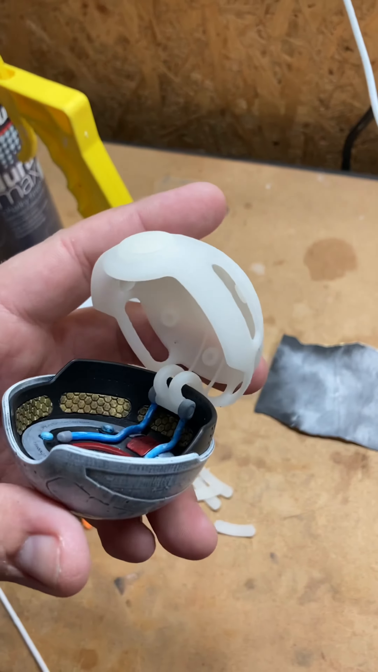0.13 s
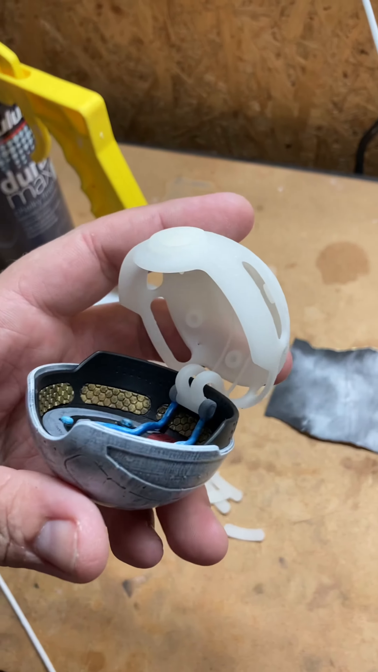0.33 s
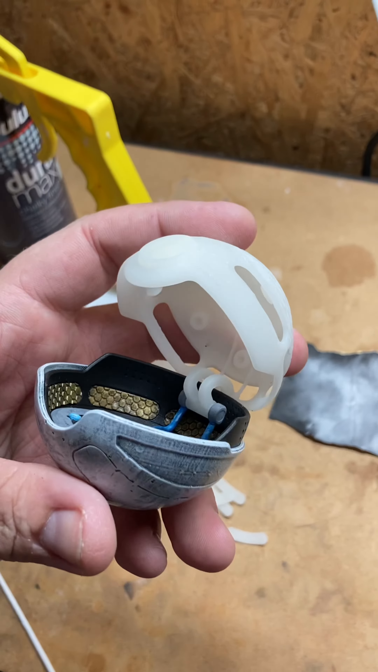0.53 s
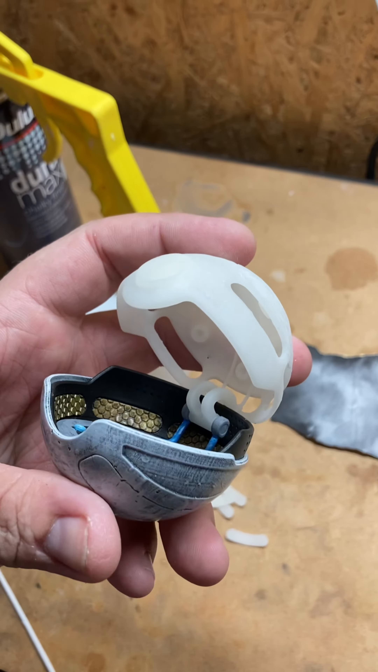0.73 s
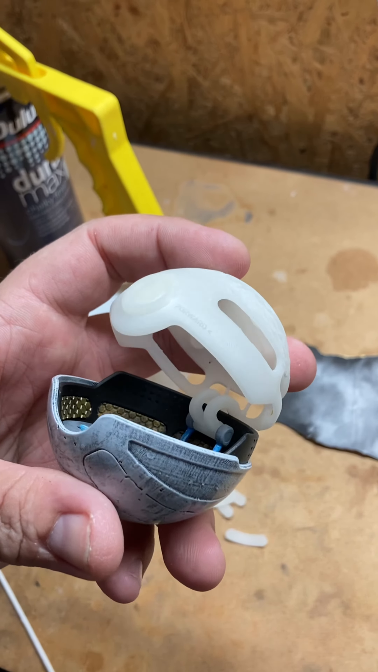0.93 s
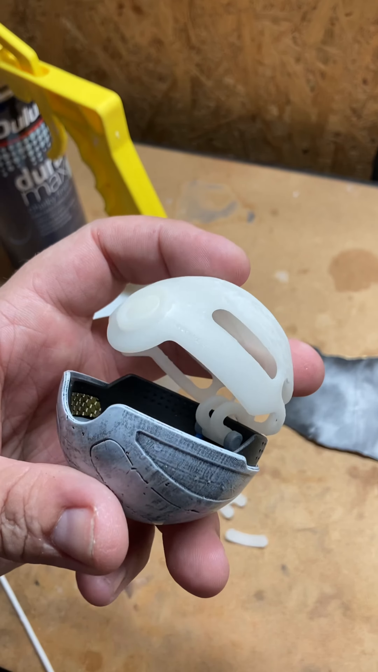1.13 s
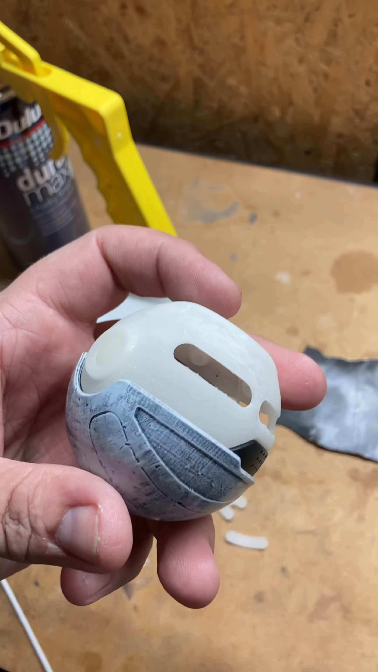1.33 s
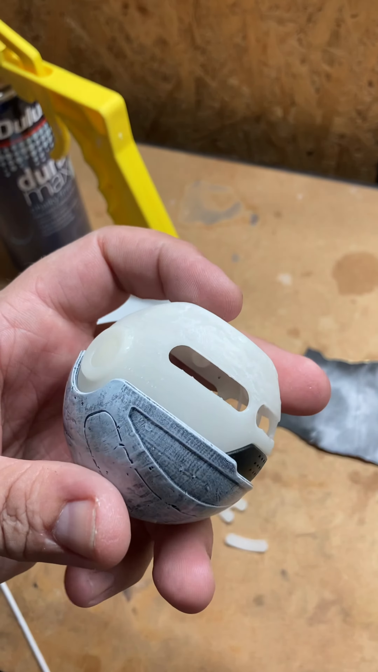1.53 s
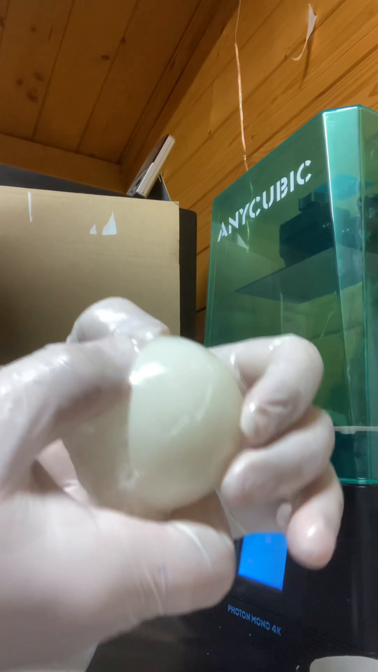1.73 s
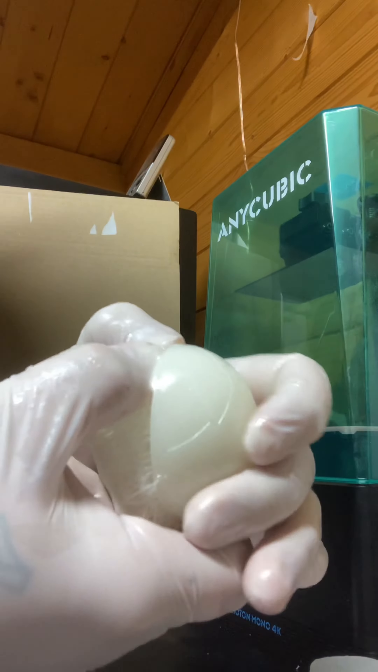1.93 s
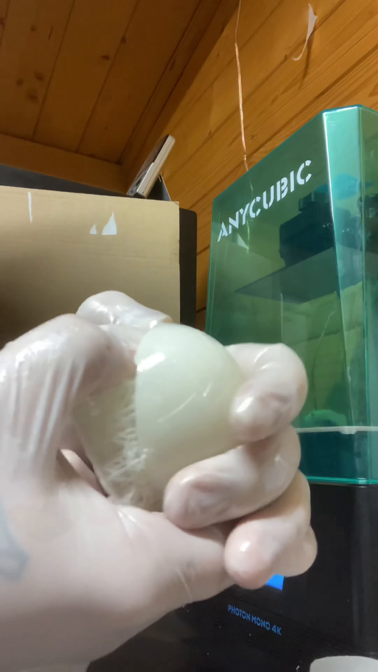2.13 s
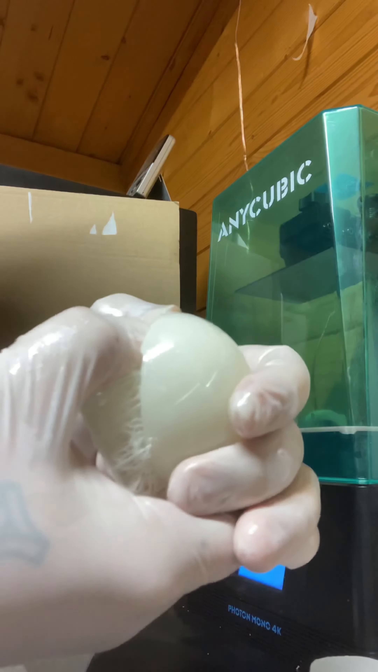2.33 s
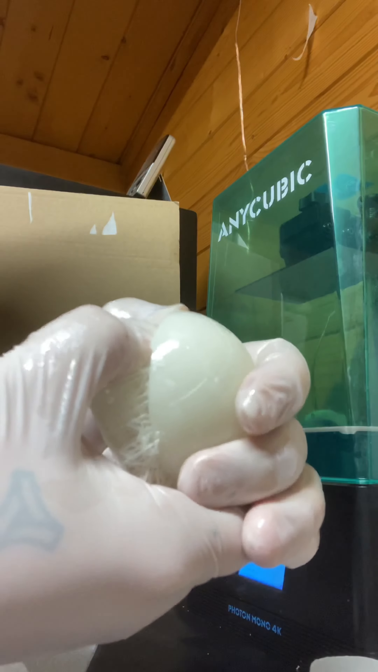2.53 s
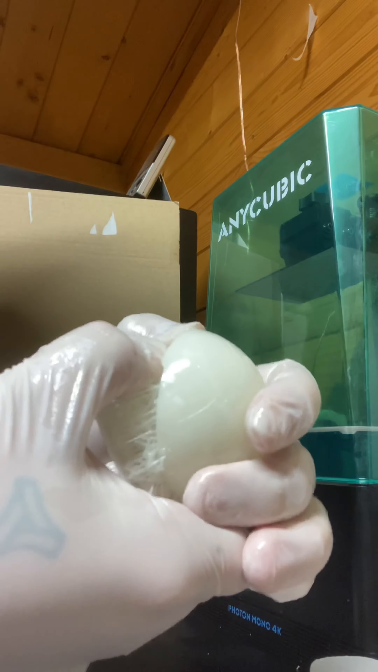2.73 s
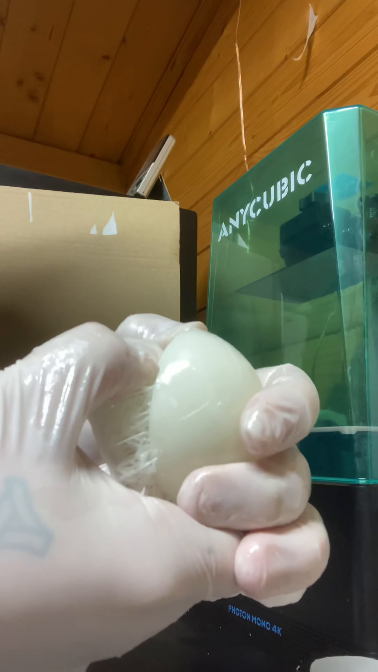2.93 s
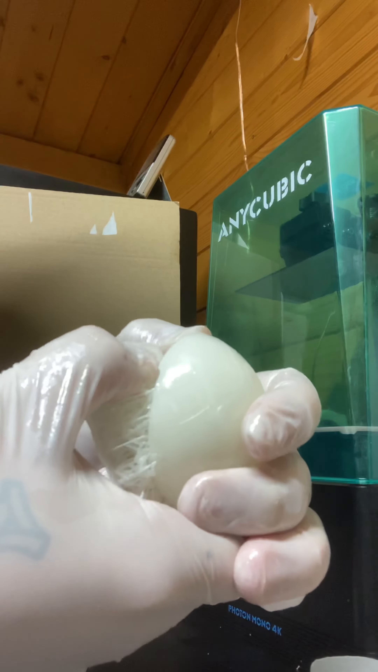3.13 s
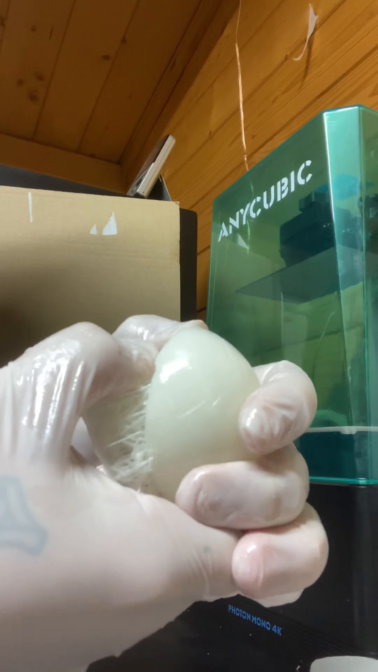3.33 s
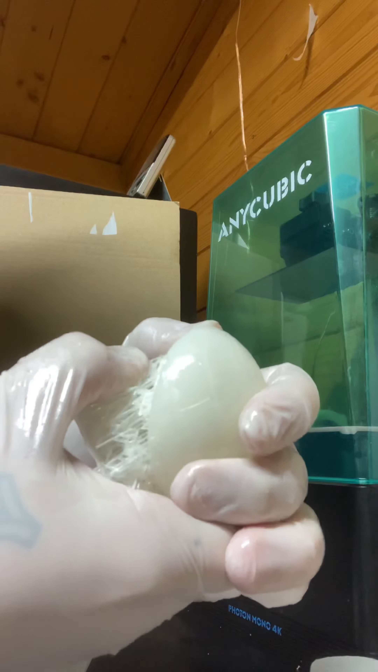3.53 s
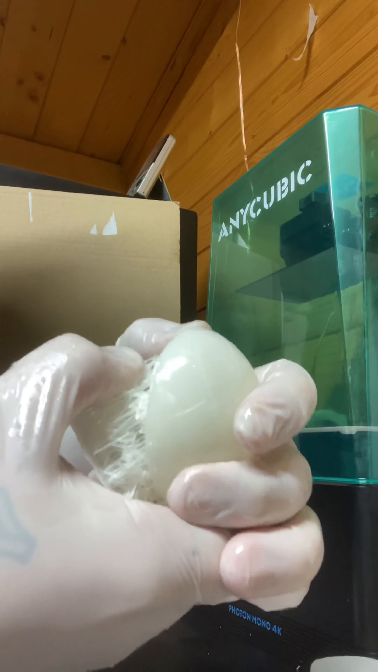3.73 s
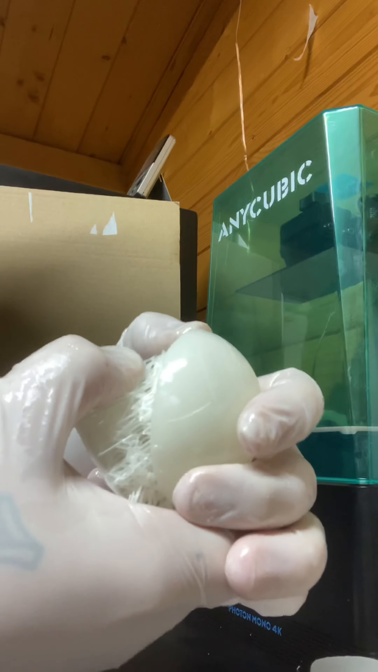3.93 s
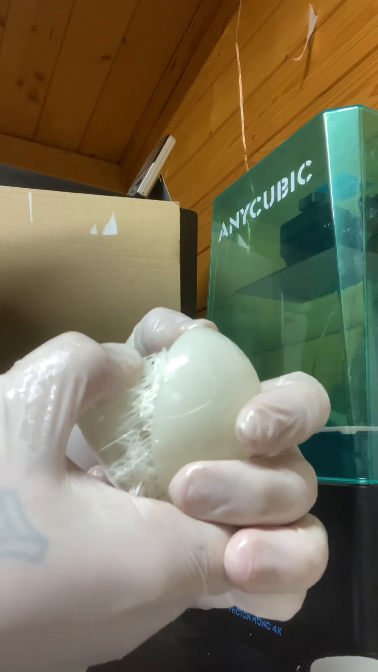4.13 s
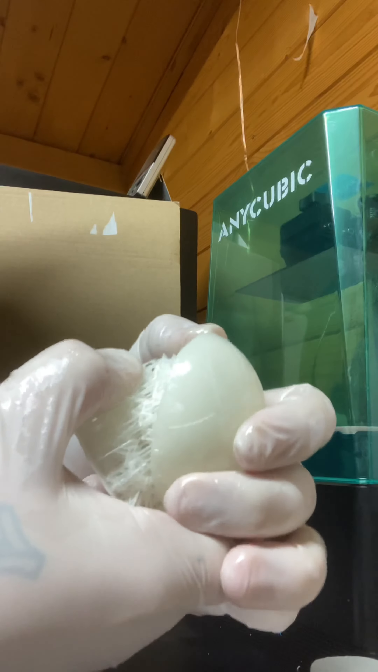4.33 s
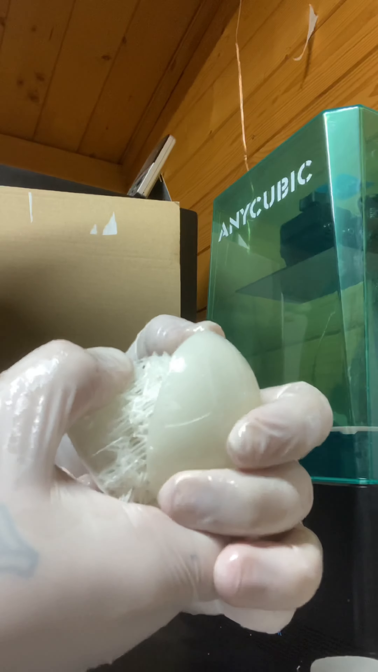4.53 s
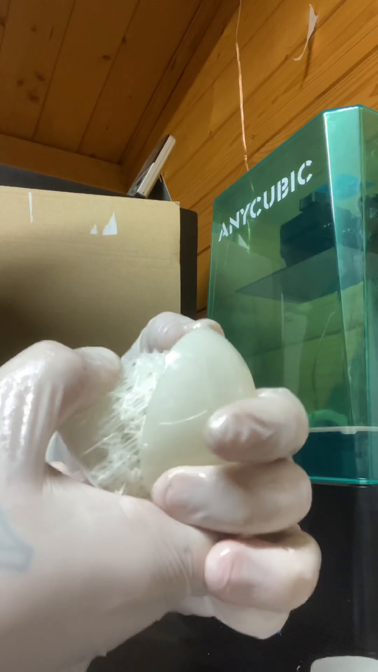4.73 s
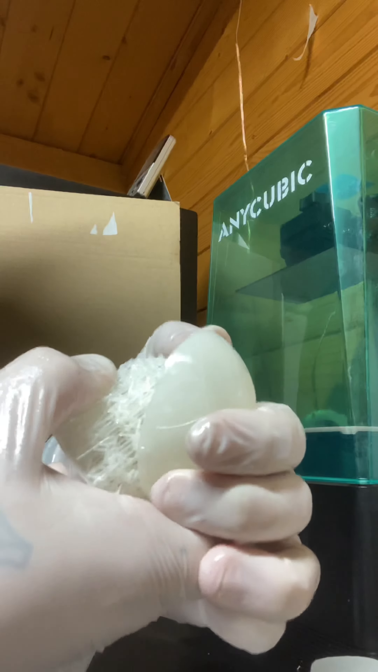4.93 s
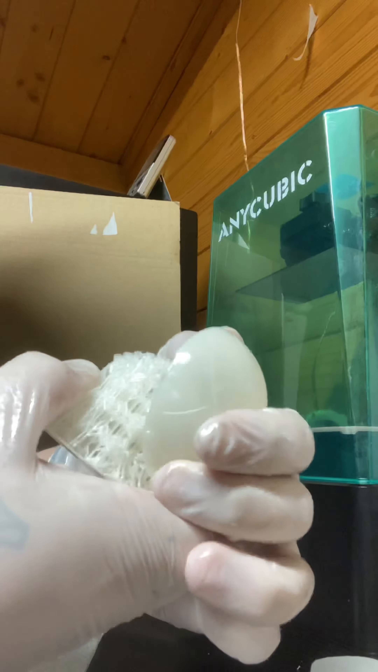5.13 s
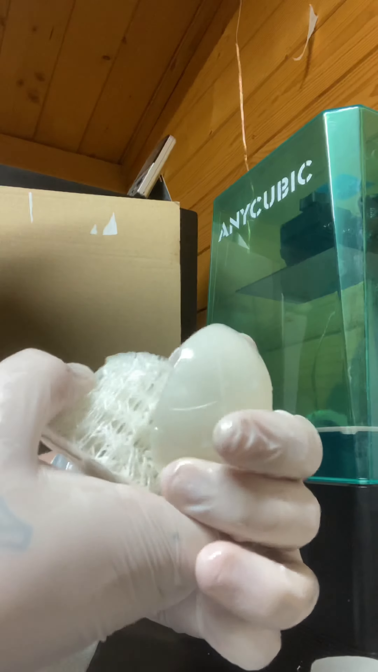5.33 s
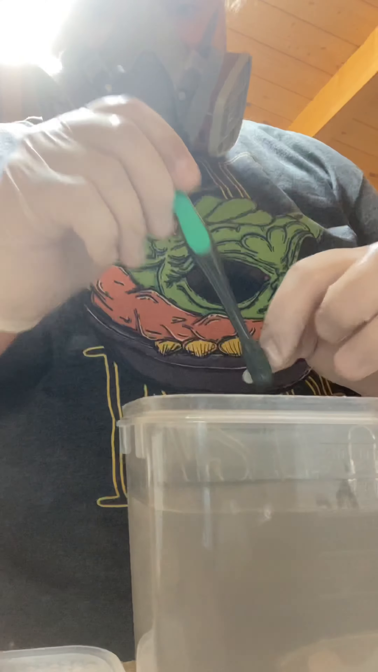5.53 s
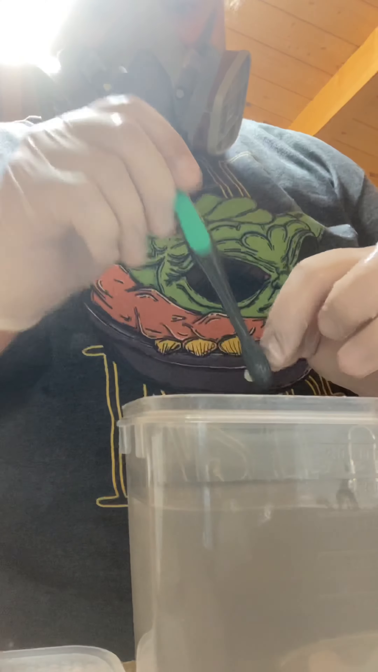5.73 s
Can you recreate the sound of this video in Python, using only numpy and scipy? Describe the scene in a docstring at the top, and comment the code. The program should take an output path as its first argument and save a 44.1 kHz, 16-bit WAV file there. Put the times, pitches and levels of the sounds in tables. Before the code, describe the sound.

Close up in a small wooden workshop: over low rumble, faint plastic taps lead to one hollow click as a small helmet shuts. A soft rush follows and fades while faint ticks sound. Then gloved hands peel brittle supports from a hollow plastic print, with loud dry snaps in dense clusters, pauses and another flurry. It ends abruptly on a quiet fan motor drone with slight rubbing.

```python
"""Peeling supports in a workshop

Three moments in a small wooden workshop, heard from close by, one straight after the other.
First, a little printed helmet clicks shut over a low rumble: noise bursts ring its hollow shell.
Then gloved hands peel brittle supports off a hollow print. Struts crack singly and in runs: each break is
a tiny noise burst that pings its strut and rings the shell. Gloves crackle, and filtered noise makes a soft rush.
Steady tones make the mains hum under the peeling and, at the end, the drone of a small fan motor.
"""
import sys
import numpy as np
from scipy import signal
from scipy.fft import rfft, irfft, next_fast_len
from scipy.io import wavfile
from scipy.ndimage import uniform_filter1d, minimum_filter1d

SR = 44100
rng = np.random.default_rng(int(sys.argv[2]) if len(sys.argv) > 2 else 0)


def to_wav(s):
    """Save 16-bit WAV."""
    ch = np.atleast_2d(s).T  # columns
    pcm = np.round(np.clip(ch, -1, 1) * 32767)  # PCM
    wavfile.write(sys.argv[1], SR, pcm.astype(np.int16))


N = 254677
HIT = 4096  # samples kept of each short sound
TIME, AGE = np.arange(N) / SR, np.arange(HIT) / SR  # seconds into the scene, seconds into a short sound
PRINTER_FROM_S, FAN_FROM_S = 1.59, 5.447  # when the second and third moments begin
TOP_HZ = 16200  # highest pitch that is kept

# Sharp snaps: single struts breaking, and near 2.46 s a knock on the shell. Each row: start in seconds, crack
# level in dB.
STRUT_SNAPS = [(1.936, -50.5), (2.072, -42), (2.089, -39.5), (2.132, -46.5), (2.182, -44), (2.213, -48.5),
               (2.2445, -49), (2.257, -39), (2.385, -53), (2.464, -40.5), (2.493, -48), (2.646, -52),
               (2.763, -61), (2.836, -32), (2.888, -13.5), (2.907, -8.5), (2.925, -9.5), (2.9759, -11.5),
               (3.011, -18.5), (3.021, -11.5), (3.0448, -15.5), (3.047, -13), (3.062, -18.5), (3.0798, -19),
               (3.185, -14.5), (3.202, -18.5), (3.2487, -12), (3.27, -16.5), (3.2938, -18), (3.3391, -7.5),
               (3.3651, -5.5), (3.437, -11), (3.442, -17.5), (3.453, -26.5), (3.473, -26), (4.3459, -8.5),
               (4.353, -24.5), (4.365, -18.5), (4.609, -16), (4.637, -13.5), (4.7091, -11.5), (4.8743, -8),
               (4.886, -17.5), (4.9278, -13), (4.944, -22), (4.9492, -10.5), (4.961, -18), (4.968, -7),
               (4.999, -19), (5.02, -22.5), (5.3493, -25)]
# Struts tearing off in quick runs of four cracks, nearly even in spacing.
# Each row: start in seconds, length in seconds, middle crack level in dB, middle shell ring level in dB.
STRUT_TEARS = [(3.372, .0075, -8, -17), (3.3848, 0.01, -17, -20), (3.4017, 0.013, -9.5, -17.5),
               (3.4247, .0104, -11.5, -12.5), (4.9767, .0046, -12.5, -16)]
TEAR_SWELL_DB = 0.5  # growth from first to last strut
TEAR_UNEVEN = 0.2  # largest timing error, as a share of the gap between struts
STRUT_PITCH_SCATTER = 0.025  # typical share by which a strut is off pitch
STRUT_SCATTER_DB = 3.5  # largest random level change of a strut in a tear

# Each pull of the fingers bends another row of struts and grips the shell anew.
# Each row: start in seconds, middle strut pitch in Hz, strut overtone level in dB,
# shell ring of a single snap in dB above its crack, favoured shell pitch in Hz.
FINGER_PULLS = [(1.6, 7460, -1, -5.5, 2740), (2.4, 7540, -3.5, 4.5, 1850), (2.8, 8840, 1, -10, 1570),
                (3.383, 7650, 3, -3, 1585), (4.2, 7230, 2, -7.5, 1600), (4.5, 7440, 0.5, -1.5, 1650),
                (4.68, 7620, 1, -8.5, 1733), (4.9, 7620, 0.5, -1.5, 2243)]
# Low ringing tones of a broken strut's stub.
# Each row: multiple of the strut's pitch, bandwidth in Hz, middle level in dB.
STUB_LOW_MODES = [(.62, 1189, -13), (.85, 1212, -8), (1, 1100, -1.5), (1.14, 1702, 1)]
# High ringing tones of the stub. Each row: multiple of the pitch, bandwidth in Hz, middle level in dB.
STUB_HIGH_MODES = [(1.32, 1518, -1.5), (1.47, 1634, -3), (1.72, 2400, -5), (2.05, 2289, -13)]
# Ringing tones of the hollow print, damped by the hand.
# Each row: middle pitch in Hz, time to fall 60 dB in seconds, middle level in dB before favouring a pitch.
PRINT_MODES = [(1171, 0.018, -3.5), (1237, 0.037, -9.5), (1415.6, 0.074, -7), (1629, 0.032, 0),
               (1847, 0.041, -5), (1993, 0.026, -2.5), (2257, 0.064, -8), (2490, 0.027, -6.5),
               (2878, 0.015, 2.5), (3595, 0.023, -8), (3942, 0.02, 0.5), (4250, 0.011, -4.5),
               (5530, 0.019, -5.5), (6440, .012, -4)]
# The load jolts into the hands when the latch or a row of struts gives way.
# Each row: start in seconds, level in dB.
HAND_JOLTS = [(0.861, -46), (1.025, -43.5), (1.211, -44), (3.38, -41.5), (3.405, -40), (3.432, -36),
              (4.347, -39), (4.659, -42), (4.968, -35.5), (4.991, -35), (5.351, -42.5)]
# Gloves and fingers sliding on plastic, and in the third moment a brush or tweezers scratching. Each row:
# middle in seconds, length in seconds, peak level in dB.
SLIDES = [(1.04, .05, -73), (1.202, 0.057, -57.5), (1.864, 0.16, -74), (2.253, 0.1, -63),
          (2.486, 0.11, -65), (3.867, 0.14, -77), (4.018, 0.012, -68), (5.526, 0.047, -56),
          (5.637, .04, -61), (5.729, 0.033, -54.5)]
GRIP_DB = -81  # the gloves never lie quite still on the print

# Helmet halves touching and latching. Each row: start in seconds, tick level in dB, ring level in dB.
HELMET_TAPS = [(.3827, -65, -69), (.7315, -70, -66), (.8615, -55, -46), (1.0208, -55, -45),
               (1.03, -59, -47), (1.1566, -39, -32), (1.2105, -26, -14), (1.2135, -34, -21)]
# Ringing tones of the helmet.
# Each row: middle pitch in Hz, time to fall 60 dB in seconds, middle level in dB before favouring a pitch.
HELMET_MODES = [(330, 0.03, -4.5), (1272, 0.09, -15), (1478, 0.017, 11.5), (1686, .03, 9), (1857, .02, 4),
                (2107, 0.027, 6), (2300, 0.012, 4.5), (3130, 0.016, -27), (4350, 0.012, -3),
                (5670, .012, -16.5)]

# Colour of a soft rush in the printer corner. Each row: frequency in Hz, relative level in dB per Hz.
RUSH_COLOUR_POINTS = [(180, -10), (300, -2.5), (420, 0), (520, 5), (680, 1.5), (850, -18), (1200, -19.5),
                      (2000, -18), (3500, -31.5), (8000, -41)]
# The rush holds, then dies away to a trace (its levels also flicker a little).
RUSH_DB, RUSH_UNTIL_S, RUSH_FADE_DB_PER_S, RUSH_REST_DB = -56.5, 2.414, 18.5, -82
# Colour of the low bench rumble. Each row: frequency in Hz, relative level in dB per Hz.
BENCH_RUMBLE_COLOUR = [(20, -56), (30, -21), (44, -3.5), (95, 2), (130, -14.5), (170, -19), (260, -26),
                       (1000, -66)]
# Colour of the rumble and air at the bench. Each row: frequency in Hz, relative level in dB per Hz.
BENCH_AIR_COLOUR = [(60, 3), (190, -4), (270, -15.5), (400, -8.5), (600, -16.5), (840, -7), (1100, -20),
                    (2000, -29.5), (3000, -38.5), (6000, -45), (9000, -38.5), (16000, -75)]
# Colour of the rumble and air at the printer. Each row: frequency in Hz, relative level in dB per Hz.
PRINTER_AIR_COLOUR = [(25, -19.5), (55, 3), (90, 1.5), (160, -4), (220, -23.5), (400, -22.5), (700, -36.5),
                      (1100, -42), (1700, -34.5), (3500, -32.5), (5500, -42.5), (9000, -35.5), (16000, -46)]
# Colour of the rumble and air beside the fan. Each row: frequency in Hz, relative level in dB per Hz.
FAN_AIR_COLOUR = [(25, -33.5), (60, 1.5), (120, -2.5), (200, 2), (320, -3.5), (600, -10), (900, -16.5),
                  (1200, -19.5), (1550, -10.5), (2000, -18), (2600, -22.5), (6000, -32.5), (10000, -21.5),
                  (16000, -40)]
# Steady tones at the bench. Each row: pitch in Hz, level in dB before wavering.
BENCH_TONES = [(59.2, -59.5), (91.5, -55), (118.4, -58.5), (204.6, -69)]
# Mains hum at the printer. Each row: pitch in Hz, level in dB before wavering.
MAINS_TONES = [(119.7, -59.5), (143, -71)]
# Drone of the fan motor. Each row: pitch in Hz, level in dB before wavering.
FAN_MOTOR_TONES = [(92, -88), (140, -55.5), (184, -48), (278, -58), (371, -70.5), (466, -71.5),
                   (560, -70.5), (652, -73.5), (1400, -71.5), (1590, -72), (1868, -70.5), (2245, -75.5)]


def undb(db):
    """Turn decibels into a gain."""
    return 10 ** (np.asarray(db) / 20)


def blow(x, db):
    """Scale a short sound to the energy of one millisecond at db."""
    millisecond = SR / 1000
    energy = np.mean(np.sum(x ** 2, axis=-1))
    return x * undb(db) * np.sqrt(millisecond / energy)


def add(out, s, x):
    """Mix a short sound in at time s."""
    i = int(s * SR)
    out[:, i:i + HIT] += x[..., :N - i]


def wide(mid, side, width):
    """Make left and right from what they share (mid) and how they differ (side)."""
    return mid + width * side * np.array([[1], [-1]])


def convolve(x, response):
    """Pass x through a response, keeping its length."""
    return signal.fftconvolve(np.atleast_2d(x), np.atleast_2d(response), axes=-1)[:, :x.shape[-1]]


def band(x, lo_hz, hi_hz, order=2):
    """Keep only the frequencies between two limits."""
    edges = [lo_hz, min(hi_hz, SR / 2 - 100)]
    return signal.sosfilt(signal.butter(order, edges, "band", fs=SR, output="sos"), x)


def bass_cut(x, corner_hz, order=4):
    """High-pass: small objects and microphones lose the long wavelengths."""
    return signal.sosfilt(signal.butter(order, corner_hz, "high", fs=SR, output="sos"), x)


def walk(rate):
    """Random drift that glides from one chance value to the next, about rate values a second."""
    k = int(SR / rate)
    steps = np.repeat(rng.standard_normal(N // k + 1), k)
    return uniform_filter1d(steps, k)[:N]


def burst(decay_s):
    """A contact or fracture: a cloud of micro-cracks that dies within moments."""
    return rng.choice([-1., 1.], HIT) * np.exp(-AGE / decay_s)


def ring(modes, scatter_db=3.0):
    """Sum of dying tones; each blow lands elsewhere, so it shifts their levels and pitches a little."""
    hz, t60, db = np.transpose(modes)[:, :, None]
    size, detune = rng.standard_normal((2, len(modes), 1))
    sign = (-1) ** np.arange(len(modes))[:, None]  # neighbouring tones start in opposite directions
    swing = sign * np.sin(2 * np.pi * hz * (1 + .006 * detune) * AGE)
    decay = np.exp(-np.log(1000) * AGE / t60)
    return np.sum(undb(db + scatter_db * size) * decay * swing, axis=0)


def body(modes, focus_hz, contact_s, turn, scatter, clack_db, clack_s, focus_db=7):
    """A hollow shell rings in a few clear modes over a clack of crowded ones; a blow favours one pitch."""
    def boost_db(hz):
        return focus_db * np.exp(-(np.log(hz / focus_hz) / 0.047) ** 2)

    def crowded():
        return blow(band(burst(clack_s), 0.73 * focus_hz, 1.73 * focus_hz), clack_db)

    near = [(hz, t60, db + boost_db(hz)) for hz, t60, db in modes]
    clear = blow(convolve(burst(contact_s), ring(near))[0], 0)
    mid = clear + crowded()
    # its two faces swing out of step, so left and right differ in phase
    out_of_step = turn * signal.hilbert(mid).imag
    return wide(mid, out_of_step + scatter * crowded(), 1)


def room(x, colour, t60_s, t60_top_s, gap_s=0.0022):
    """Echoes of a small room blur into dying noise, coloured by (Hz, dB) points; treble dies sooner."""
    t = np.arange(SR // 2) / SR
    hz = np.fft.rfftfreq(len(t), 1 / SR)
    gain = undb(np.interp(hz, *np.transpose(colour)))
    noise = rfft(rng.standard_normal((2, len(t)))) * gain
    high = hz / hz[-1]  # share of the treble decay, rising with frequency

    def dying(share, t60):
        return irfft(noise * share, len(t)) * np.exp(-np.log(1000) * t / t60)

    tail = dying(1 - high, t60_s) + dying(high, t60_top_s)
    build_up = 1 - np.exp(-(t / gap_s) ** 2)  # the first echoes need time to arrive
    return convolve(x, tail * build_up / np.sqrt(SR * t60_s / np.log(1e6)))


def supports():
    """Each break takes about a millisecond, sheds splinters, pings its strut and kicks the shell."""
    fracture_s, splinter_db, splinter_s = 0.00098, -19, 0.0056
    cracks, spread, shell = np.zeros((3, 2, N))
    for s, db, hz, overtone_db, ring_db, focus_hz in breaks():
        def crack():
            return strut(hz, overtone_db, burst(fracture_s) + undb(splinter_db) * burst(splinter_s))
        add(cracks, s, blow(wide(crack(), crack(), 0.12), db))
        # summed over all directions, the crack that reaches the walls has a smoother spectrum
        add(spread, s, blow(strut(hz, overtone_db, signal.unit_impulse(HIT)), db))
        kick = body(PRINT_MODES, focus_hz, contact_s=.00008, turn=0.53, scatter=.9, clack_db=-4.5, clack_s=0.0078)
        add(shell, s, blow(kick, ring_db))
    shell_sound = bass_cut(shell, 1200, order=5) + undb(-3) * band(shell, 390, 800)
    handled = shell_sound + jolts() + glove() + creak()
    walls = [(300, -10), (1000, -10.5), (1600, -10), (2300, -9.5),
             (4000, -6), (7500, -8.5), (11000, -14), (16000, -15.0)]
    tail = room(spread + handled, walls, t60_s=0.31, t60_top_s=0.17)
    return cracks + handled + tail


def breaks(count=4):
    """List every breaking strut with its levels and pitches; a tear takes count struts in quick order."""
    def pull(s):
        started = sum(row[0] <= s for row in FINGER_PULLS)
        return FINGER_PULLS[max(started - 1, 0)][1:]

    hits = []
    for s, db in STRUT_SNAPS:
        _, _, ring_above_db, _ = pull(s)
        hits.append((s, db, db + ring_above_db))
    for start_s, length_s, db, ring_db in STRUT_TEARS:
        late, size = rng.uniform(-1, 1, (count, 2)).T
        along = (np.arange(count) + TEAR_UNEVEN * late) / (count - 1)
        swell_db = TEAR_SWELL_DB * (along - .5) + STRUT_SCATTER_DB * size
        hits += zip(start_s + length_s * along, db + swell_db, ring_db + swell_db)
    # no two struts are alike
    for (s, db, ring_db), detune in zip(hits, rng.standard_normal(len(hits))):
        hz, overtone_db, _, focus_hz = pull(s)
        yield s, db, hz * (1 + STRUT_PITCH_SCATTER * detune), overtone_db, ring_db, focus_hz


def strut(hz, overtone_db, fracture):
    """The stub of a broken strut pings: a low and a high group of short modes."""
    def ping(modes):
        # a wider band means a faster decay
        tuned = [(min(hz * k, TOP_HZ), np.log(1000) / (np.pi * width_hz), db) for k, width_hz, db in modes]
        stub = ring(tuned, scatter_db=1.9)
        return blow(bass_cut(convolve(fracture, stub)[0], 5500, order=2), 0)
    return ping(STUB_LOW_MODES) + undb(overtone_db) * ping(STUB_HIGH_MODES)


def jolts():
    """Soft thuds as the plastic kicks into the hands: short bursts of low noise."""
    out = np.zeros((2, N))
    for s, db in HAND_JOLTS:
        thud = band(wide(burst(0.011), burst(0.014), 0.45), 265, 680, order=3)
        add(out, s, blow(thud, db))
    return out


def glove(grain_db=3.5, slips_per_s=3000, low_hz=2600):
    """Rubber, or at the end a brush or tweezers, creeping over resin: a fine crackle of uneven slips that
    swells and fades with each slide."""
    happens = rng.random((2, N)) < slips_per_s / SR
    strength = rng.standard_normal((2, N))
    extra_db = grain_db * np.minimum(rng.exponential(size=(2, N)), 3)
    slips = happens * strength * undb(extra_db)
    crackle = band(wide(*slips, 0.82), low_hz, 20000, order=1)
    slides = sum(undb(db) * np.exp(-(2 * (TIME - s) / length_s) ** 2) for s, length_s, db in SLIDES)
    grip = undb(GRIP_DB) * (TIME > PRINTER_FROM_S)
    return crackle / crackle.std() * (slides + grip)


def creak(start_s=4.152, gap_s=0.67 / 150, db=-65.0, count=12):
    """Just before it gives, the bent raft slips in quick, even steps against the shell."""
    out = np.zeros((2, N))
    for s in start_s + gap_s * np.arange(1, count + 1):
        shell_ring = blow(convolve(burst(.0006), ring(PRINT_MODES)), db)
        scrape = blow(band(burst(0.0017), 7400, 9530), db)
        add(out, s, shell_ring + scrape)
    return out


def helmet():
    """The two halves brush, then latch with a hollow click: bright ticks over a ringing shell."""
    out = np.zeros((2, N))
    for s, tick_db, ring_db in HELMET_TAPS:
        tick = band(wide(burst(0.0042), burst(0.0063), 0.97), 5540, 11000)
        add(out, s, blow(tick, tick_db))
        click = body(HELMET_MODES, 1660, contact_s=0.00027, turn=-0.9, scatter=0.87,
                     clack_db=-6.5, clack_s=0.0067, focus_db=3.5)
        add(out, s, blow(bass_cut(click, 220), ring_db))
    walls = [(300, -10.5), (1600, -17), (5000, -17), (9000, -17.5), (16000, -19.5)]
    return out + room(out, walls, t60_s=0.27, t60_top_s=0.16)


def rush():
    """A soft, hollow rush of coloured noise that holds and then fades."""
    fading_db = RUSH_DB - RUSH_FADE_DB_PER_S * np.maximum(TIME - RUSH_UNTIL_S, 0)
    return air(RUSH_COLOUR_POINTS, np.maximum(fading_db, RUSH_REST_DB))


def tones(lines, waver_db, drift, width=.2):
    """Motor and mains tones waver together in level and phase; reflections shift them left to right."""
    swell = undb(waver_db * walk(7.6))
    slip = drift * walk(21)  # radians
    z = sum(np.sqrt(2) * undb(db) * np.exp(1j * (2 * np.pi * hz * TIME + slip)) for hz, db in lines)
    return wide(z.imag, z.real, width) * swell


def air(colour, db, flicker_db=2.0, bass_width=.17, top_width=1.0):
    """Coloured noise with a flickering level: bass is more alike left and right, the rest diffuse."""
    size = next_fast_len(N, real=True)
    hz = np.fft.rfftfreq(size, 1 / SR) + 1  # the 1 avoids the logarithm of zero
    points, levels = np.transpose(colour)
    gain = undb(np.interp(np.log(hz), np.log(points), levels))
    mid, side = rfft(rng.standard_normal((2, size))) * gain
    spread = np.clip(hz / 600, bass_width, 1)
    x = irfft(wide(mid, side * spread, top_width), size)[:, :N]
    return x / x.std() * undb(db + flicker_db * walk(8.72))


def background():
    """Each of the three spots has its own steady tones and coloured noise."""
    bench = air(BENCH_RUMBLE_COLOUR, -49, flicker_db=3) + air(BENCH_AIR_COLOUR, -60)
    bench += tones(BENCH_TONES, waver_db=1.5, drift=0.64, width=.12)
    printer = air(PRINTER_AIR_COLOUR, -63, bass_width=0.49) + rush()
    printer += tones(MAINS_TONES, waver_db=0.5, drift=.12, width=.35)
    fan = air(FAN_AIR_COLOUR, -54, bass_width=.3, top_width=1.23)
    fan += tones(FAN_MOTOR_TONES, waver_db=0.8, drift=0.6, width=0.23)
    return np.where(TIME < PRINTER_FROM_S, bench, np.where(TIME < FAN_FROM_S, printer, fan))


def scene():
    """Supports, helmet and the workshop around them."""
    return supports() + helmet() + background()


def record(dry):
    """High treble sits close to the middle; the tallest peaks are limited, the deepest bass and the top cut."""
    side = (dry[0] - dry[1]) / 2
    low_side = signal.sosfiltfilt(signal.butter(4, 7000, fs=SR, output="sos"), side)
    x = wide(dry.mean(axis=0), low_side + 0.18 * (side - low_side), 1)
    # turn down smoothly around any peak above 0.9
    headroom = .9 / np.maximum(np.abs(x).max(axis=0), .9)
    gain = uniform_filter1d(minimum_filter1d(headroom, size=65), size=65)
    no_deep_bass = bass_cut(x * gain, 38, order=6)
    return signal.sosfilt(signal.ellip(8, .2, 70, TOP_HZ, fs=SR, output="sos"), no_deep_bass)


dry = scene()
out = record(dry)
to_wav(out)
```